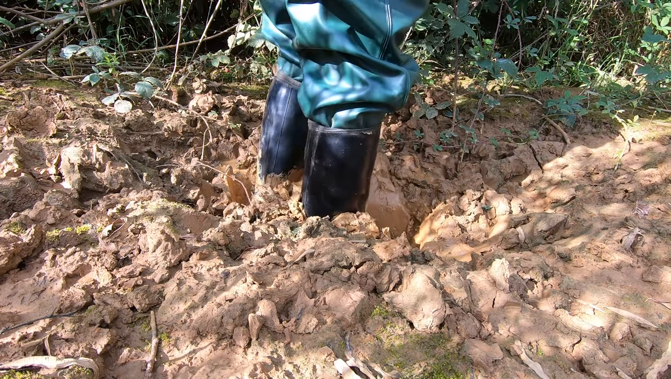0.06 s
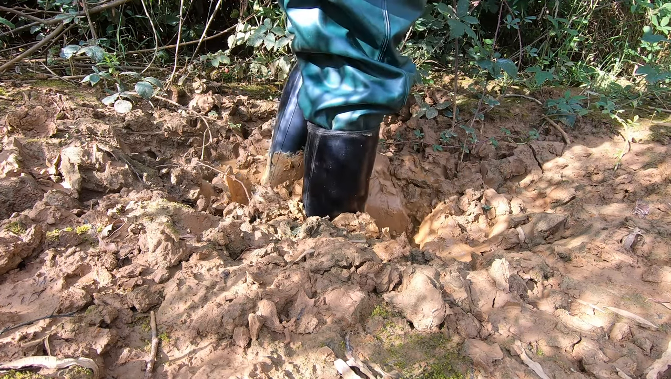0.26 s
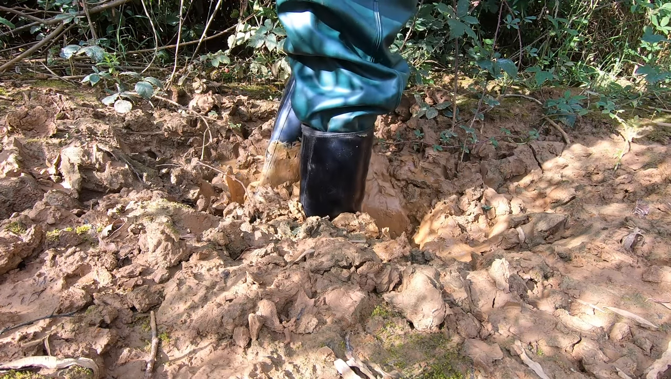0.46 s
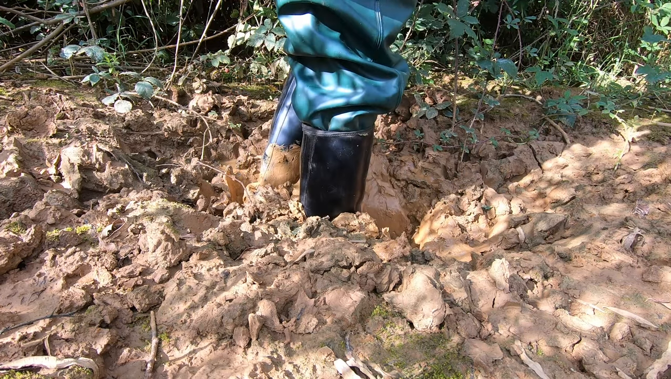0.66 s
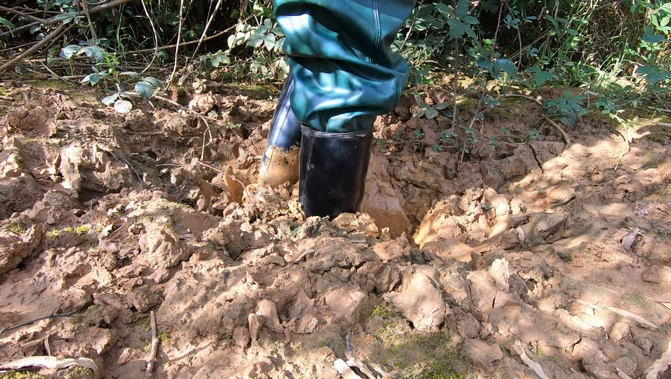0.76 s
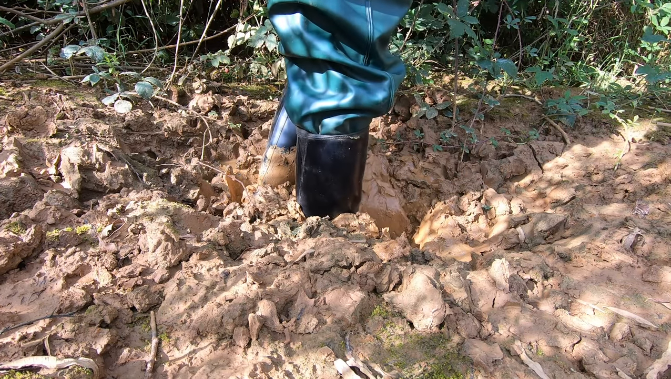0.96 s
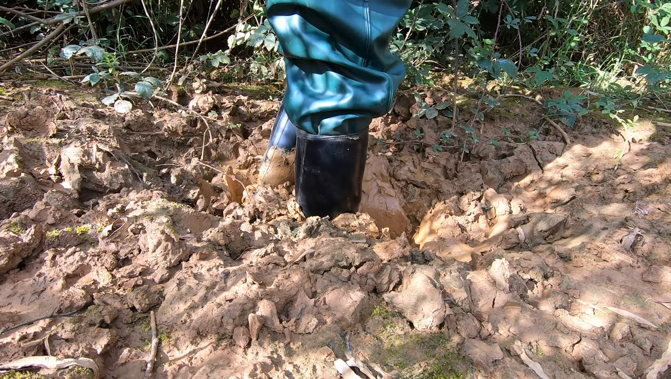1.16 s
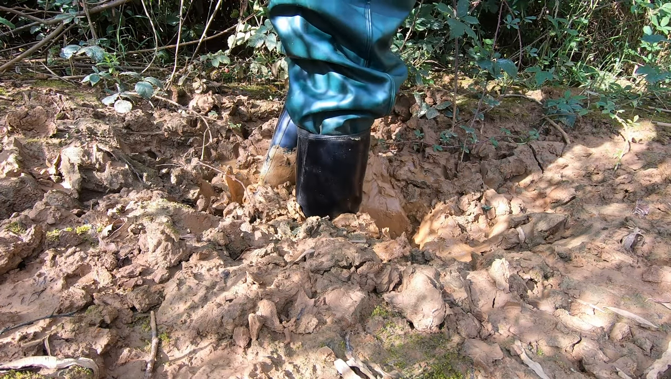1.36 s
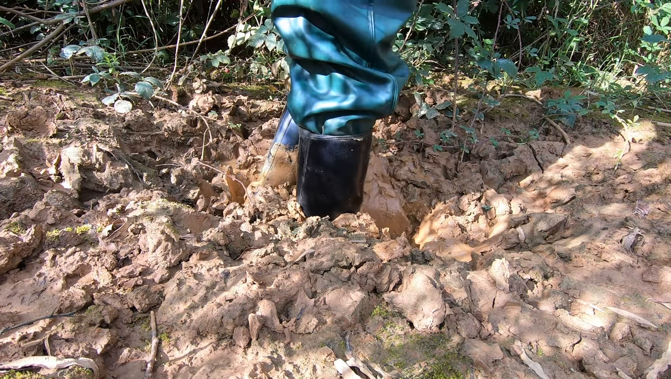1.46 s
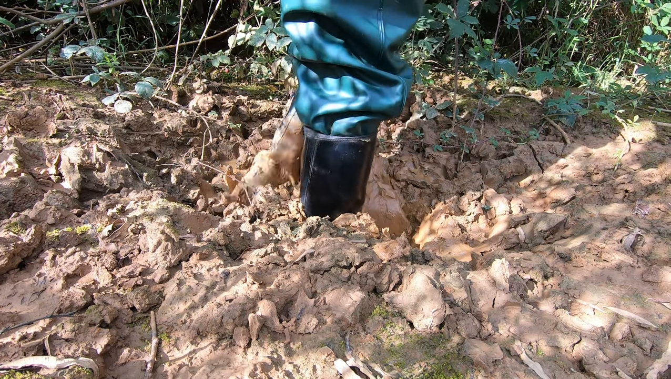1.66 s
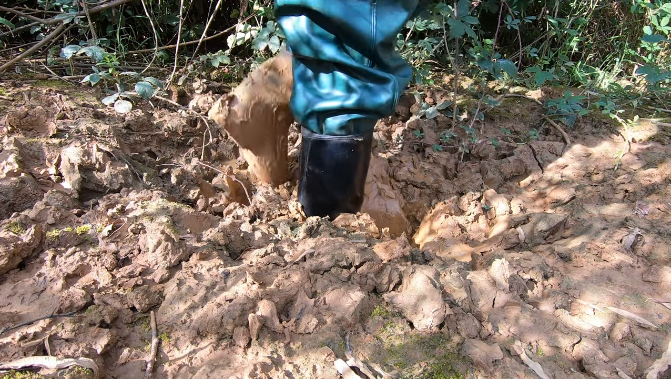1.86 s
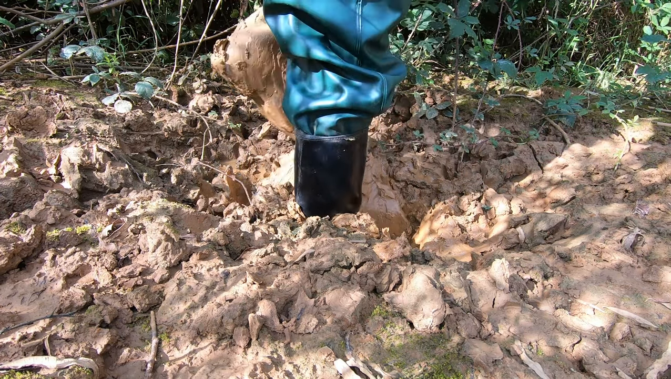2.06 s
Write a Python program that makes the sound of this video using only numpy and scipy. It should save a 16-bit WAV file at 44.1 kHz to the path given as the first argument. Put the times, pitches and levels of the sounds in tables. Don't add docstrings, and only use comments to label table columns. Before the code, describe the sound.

Two short wet mud squelches, close up, as a rubber boot sinks and is pulled out of sticky clay

```python
import sys
import numpy as np
from scipy import signal
from scipy.fft import rfft, irfft, next_fast_len
from scipy.io import wavfile
from scipy.ndimage import uniform_filter1d, map_coordinates

SR = 44100
rng = np.random.default_rng(int(sys.argv[2]) if len(sys.argv) > 2 else 0)


def amplitude_ratio(level_db):
    exponent = np.asarray(level_db, float) / 20
    return 10 ** exponent


def generate_wav(signal):
    frames = np.transpose(np.atleast_2d(signal))
    scaled = np.clip(frames, -1, 1) * 32767
    pcm = np.round(scaled).astype(np.int16)
    wavfile.write(sys.argv[1], SR, pcm)


N = 92610

# f/Hz, level/dB per Hz
HUSH_SPECTRUM = [(40, -3.5), (100, -16.5), (135, -3), (200, -1), (270, -9.5), (1300, -5.5), (7500, -17),
                 (10000, -27), (12000, -24.5)]
# f/Hz, correlation/1
HUSH_ALIKE = [(60, 1), (250, 0.5), (600, 0.14), (1500, 0.047), (3400, 0.25), (7000, 0.033)]
# t/s, level/dB
CLOTH_MOVES = [(0, -51), (.06, -57), (.1, -53.5), (.33, -55.5), (.41, -53.5), (.56, -60.5), (.68, -63),
               (.82, -59.5), (1.1, -62.5), (1.3, -62.5), (1.44, -58), (1.72, -48), (1.8, -53),
               (1.85, -48.5), (1.9, -53.5), (1.96, -49.5), (2.03, -49), (2.1, -52)]
# f/Hz, level/dB per Hz
CLOTH_SPECTRUM = [(35, -64), (60, -48), (175, -6), (703, -8), (2430, -10.5), (4250, -16), (6240, -16),
                  (10000, -27), (13000, -24)]
# t/s, peak level/dB
SLIPS = [
    (0.897, -45),
    (0.913, -40.5),
    (0.93, -45),
    (0.94, -40.5),
    (0.955, -42),
    (0.974, -43),
    (0.989, -41),
    (1.006, -40.5),
    (1.025, -39.5),
    (1.046, -50),
]
# f/Hz, width/Hz, level/dB
RUBBER_MODES = [(218, 20, 1.5), (406, 42, -2.5), (662, 99, 1), (1275, 170, -2), (2700, 510, -11)]
# t/s, peak level/dB, f/Hz
PLOPS = [(0.382, -39, 1060), (0.403, -35, 1080), (0.413, -34, 1040), (0.433, -36, 480), (0.455, -38, 1180),
         (0.471, -37, 540), (0.492, -39.5, 466), (0.535, -36, 780), (0.42, -38, 430), (0.427, -36, 1690),
         (0.522, -61, 900), (0.55, -58, 750), (0.64, -43.5, 1290), (1.47, -29.5, 824), (1.482, -26.5, 633)]
# t/s, peak level/dB, f/Hz
GLUGS = [
    (.185, -22.5, 223),
    (.195, -18, 200),
    (1.698, -23, 309),
    (1.708, -32, 285),
]
# t/s, peak level/dB, f/Hz
BIG_SNAP = [
    (0.3426, -18, 3860),
]
# t/s, peak level/dB, f/Hz
SNAPS = [(0.361, -39, 3330), (0.377, -34, 3300), (0.404, -36.5, 3260), (0.4149, -35, 2220),
         (0.4532, -41.5, 2780), (0.4718, -40, 2760), (0.477, -36, 3400), (0.4983, -39, 3450),
         (0.5217, -39, 3760), (0.5378, -34.5, 2510), (0.5744, -47, 3350), (0.6035, -42, 3480),
         (0.6434, -43, 3400), (0.384, -39.5, 2630), (0.5525, -41, 2520), (0.6217, -46, 2720),
         (0.649, -43, 2840), (0.655, -45.5, 1730), (1.2856, -50.5, 3070), (1.341, -51, 2470),
         (1.362, -43.5, 2780), (1.8433, -38.5, 3350)]
# t/s, peak level/dB, f/Hz
TICKS = [
    (0.1705, -37, 6600),
    (0.3625, -40.5, 5600),
    (0.2362, -17.5, 2920),
    (1.4823, -33.5, 5000),
    (1.5479, -19, 4660),
    (1.6764, -33, 7700),
    (1.6843, -23.5, 5430),
    (1.7406, -40.5, 8840),
    (2.02, -40, 5830),
]
# t/s, peak level/dB, f/Hz
SINK_BUBBLES = [(.203, -25, 394), (.211, -28, 380), (.215, -18.5, 900), (.221, -24, 1396), (.229, -18, 960),
                (.232, -22.5, 2727), (.234, -24.5, 266), (.2345, -28.5, 1980), (.236, -19.5, 2724),
                (.243, -15.5, 893), (.244, -21.5, 1330), (.245, -35, 4960), (.252, -20, 1418),
                (.255, -23, 5040), (.261, -18, 942), (.262, -30, 3500), (.263, -29, 313), (.264, -22, 5050),
                (.572, -47.5, 3360), (.266, -18.5, 1342)]
# t/s, peak level/dB, f/Hz
FREE_BUBBLES = [(1.469, -35, 1880), (1.483, -32.5, 1655), (1.502, -33.5, 638), (1.509, -32, 665),
                (1.522, -30, 937), (1.528, -36, 128), (1.535, -20, 847), (1.542, -21.5, 598),
                (1.543, -22.5, 950), (1.544, -26, 194), (1.546, -23, 1600), (1.572, -27, 563),
                (1.574, -19.5, 834), (1.574, -26.5, 3270), (1.58, -25, 413), (1.591, -27.5, 105),
                (1.593, -21, 1687), (1.596, -37, 616), (1.602, -28, 2700), (1.611, -24, 825),
                (1.617, -31, 3200), (1.623, -24, 2800), (1.626, -23.5, 980), (1.639, -22, 2900),
                (1.665, -31, 2900), (1.684, -34.5, 3800), (1.699, -41, 1250), (1.818, -45.5, 308),
                (1.83, -46, 3380), (1.856, -45.5, 185), (1.878, -46.5, 171), (1.918, -44, 187),
                (1.94, -42.5, 389)]
# t/s, air flow level/dB, gap opening/dB
DRAG_FLOW = [
    (1.88, -53, -3),
    (1.93, -57.5, -13),
    (1.965, -54, 5),
    (2.0, -58, 0),
    (2.06, -60.5, -4),
]
# f/Hz, width/Hz, level/dB
DRAG_POCKETS = [(1510, 97, 2.5), (2490, 87, 4), (2900, 95, 1), (6000, 840, -16)]
# t/s, air flow level/dB, gap opening/dB
SUCK_FLOW = [
    (.175, -39, -12),
    (.197, -44, -9),
    (.217, -29, -11.5),
    (.231, -31.5, -5),
    (.247, -20.5, -6),
    (.257, -26, -2.5),
    (.272, -27.5, -2),
    (.284, -49.5, -0.5),
    (.32, -59, 11),
]
# f/Hz, width/Hz, level/dB
SUCK_POCKETS = [(380, 88, -3), (866, 203, -4), (1390, 66, -9.5), (2754, 145, -5), (3500, 190, -7.5),
                (4960, 200, -10), (6800, 360, -24.5)]
# f/Hz, level/dB per Hz
SUCK_AIR = [(29, -48), (50, -5.5), (933, -4), (1420, -47), (1660, -25), (2700, -12.5), (10000, -26.5),
            (13000, -65), (22000, -120)]
# t/s, air flow level/dB, gap opening/dB
PULL_FLOW = [
    (1.45, -75, -15),
    (1.468, -44, -2),
    (1.51, -37, -9),
    (1.544, -31.5, -12.5),
    (1.556, -34.5, -6),
    (1.6, -31.5, -4.5),
    (1.634, -29.5, -3.5),
    (1.672, -42, -3.5),
    (1.7, -65, 2.5),
]
# f/Hz, width/Hz, level/dB
TIGHT_POCKETS = [(639, 66, -6), (830, 130, -4), (1627, 100, -6.5), (1950, 82, -4), (2560, 35, -9),
                 (2960, 120, -15), (4800, 130, -10.5), (5780, 100, -14)]
# f/Hz, width/Hz, level/dB
LOOSE_POCKETS = [(824, 190, -5.5), (1620, 190, -9), (1983, 29, -10), (2800, 360, -5.5), (3200, 120, -7),
                 (3850, 94, -7), (4546, 100, -10.5), (5640, 230, -12.5), (6960, 81, -17.5)]
# f/Hz, level/dB per Hz
PULL_AIR = [(29, -40), (50, -7), (715, -7), (835, 10.5), (1330, -18), (1660, -6), (10000, -35),
            (13000, -56), (22000, -120)]
AIR_BANDS_HZ = [75, 140, 280, 600, 1300, 2800, 5500, 10000]
# f/Hz, left over right level/dB, left lead/rad
PORT_SHADING = [(150, -2, .15), (550, -2, .5), (750, .5, .75), (980, 4, 1), (1300, 4.5, 0), (2300, 3, -.2),
                (3000, 1, 0), (5200, .5, .3), (9000, 0, 1), (13000, -1.5, 1.5)]
# f/Hz, level/dB
MIC_RESPONSE = [(45, -6), (85, 1.5), (9700, -1.76), (11200, -13.5), (15500, -16)]


def unit(x):
    return x / np.sqrt(np.mean(x ** 2) + 1e-20)


def along(points, hz):
    f, v = np.transpose(points)
    return np.interp(np.log(hz + 1), np.log(f + 1), v)


def curves(rows):
    s, *cols = np.transpose(rows)
    return [np.interp(np.arange(N) / SR, s, c) for c in cols]


def wobble(rate_hz):
    knots = rng.standard_normal(int(N * rate_hz / SR) + 4)
    return map_coordinates(knots, [np.arange(N) * rate_hz / SR])


def filtered(x, response):
    m = next_fast_len(N + 8192)
    spectrum = rfft(x, m) * response(np.fft.rfftfreq(m, 1 / SR))
    return irfft(spectrum, m)[..., :N]


def ringing(modes, f):
    total = 0
    for k, (hz, width_hz, db) in enumerate(modes):
        resonance = 1j * f * width_hz / (hz * hz - f * f + 1j * f * width_hz)
        total = total + (-1) ** k * amplitude_ratio(db) * resonance
    return total


def rush(spectrum, alike, patchy_db):
    z = signal.stft(rng.standard_normal((2, N + 512)), nperseg=256)[2]
    field = uniform_filter1d(rng.standard_normal(z.shape[1:]), size=4, axis=0)
    field = uniform_filter1d(field, size=12, axis=1)
    pair = signal.istft(z * amplitude_ratio(patchy_db * unit(field)), nperseg=256)[1][:, :N]

    def mid_side(hz):
        angle = np.arccos(np.clip(along(alike, hz), -1, 1)) / 2
        return amplitude_ratio(along(spectrum, hz)) * [np.cos(angle), np.sin(angle)]

    mid, side = filtered(pair, mid_side)
    return unit(np.array([mid + side, mid - side]))


def hush():
    level_db = -59.5 + np.array([[-2], [2]])
    return amplitude_ratio(level_db) * rush(HUSH_SPECTRUM, HUSH_ALIKE, patchy_db=0.7)


def bank(x):
    t60_s, level_db = 0.085, -5.5
    t = np.arange(SR // 5) / SR
    tail = rng.standard_normal((2, len(t))) * amplitude_ratio(-60 * t / t60_s)
    tail = tail / np.linalg.norm(tail[0])
    late = np.pad(x, (130, 0))[None]
    wet = signal.fftconvolve(late, tail, axes=1)[:, :N]
    tone = [(300, -18.5), (1200, 0.0), (3000, -12.5), (7000, 5.0), (12000, 4.0)]  # f/Hz, level/dB
    return amplitude_ratio(level_db) * filtered(wet, lambda f: amplitude_ratio(along(tone, f)))


def ports(x):
    hz, db, lead_rad = np.transpose(PORT_SHADING)

    def response(f):
        level_db = along(np.transpose([hz, db]), f)
        phase_rad = along(np.transpose([hz, lead_rad]), f)
        return np.array([amplitude_ratio(k * level_db) * np.exp(1j * k * phase_rad) for k in (.5, -.5)])

    return filtered(x, response)


def cloth():
    move_db, = curves(CLOTH_MOVES)
    grain = amplitude_ratio(1.6 * wobble(150))
    alike = [(200, 0.95), (4000, 0.7), (8000, 0.39)]  # f/Hz, correlation/1
    return amplitude_ratio(move_db + 1.0) * unit(grain * rush(CLOTH_SPECTRUM, alike, patchy_db=1.4))


def judder():
    slip_s = 0.014
    kicks, t = np.zeros(N + SR), np.arange(1024) / SR
    for s, db in SLIPS:
        burst = amplitude_ratio(db + 12 - 20 * t / slip_s) * rng.standard_normal(len(t))
        kicks[round(s * SR):][:len(t)] += burst
    return filtered(kicks[:N], lambda f: ringing(RUBBER_MODES, f))


def pops(rows, cycles, spread, puff_db, wide=0.17):
    puff_s = 0.0063
    out, t = np.zeros(N + SR), np.arange(2048) / SR
    for s, db, hz in rows:
        tones = 0
        for k in (-1, 0, 1.3):
            phase = 2 * np.pi * hz * (1 + spread * k) * t + rng.uniform(0, 3.2)
            tones = tones + np.sin(phase) * amplitude_ratio(-4 * abs(k))
        edges_hz = [hz * (1 - wide), hz * (1 + 1.5 * wide)]
        band = signal.butter(2, edges_hz, "band", fs=SR, output="sos")
        puff = unit(signal.sosfilt(band, rng.standard_normal(len(t))))
        puff = puff * amplitude_ratio(puff_db - 20 * t / puff_s)
        attack = 1 - np.exp(-(t * hz / 1.26) ** 2)
        pop = (tones * amplitude_ratio(-60 * t * hz / cycles) + puff) * attack
        out[round(s * SR):][:len(t)] += amplitude_ratio(db - 6.0) * pop
    return out[:N]


def plops():
    soft = pops(PLOPS, cycles=16.5, spread=0.36, puff_db=2.0, wide=0.35)
    return soft + pops(GLUGS, cycles=11.1, spread=0.14, puff_db=-25)


def snaps():
    big = pops(BIG_SNAP, cycles=60, spread=0.173, puff_db=-9)
    small = pops(SNAPS, cycles=56, spread=0.14, puff_db=-5.5, wide=0.26)
    return big + small + pops(TICKS, cycles=59, spread=0.139, puff_db=1.5, wide=0.14)


def bubbles(rows):
    t60_s, rise_s, climb = 0.03, 0.0027, 0.028
    out, t = np.zeros(N + SR), np.arange(6144) / SR
    for s, db, hz in rows:
        longer = (1000 / hz) ** 0.39
        age = t / (t60_s * longer)
        tone = np.sin(2 * np.pi * hz * t * (1 + climb * np.minimum(age, 1)))
        swell = 1 - np.exp(-(t / (rise_s * longer)) ** 2)
        out[round(s * SR):][:len(t)] += amplitude_ratio(db + 5.0 - 60 * age) * swell * tone
    return out[:N]


def squelch(control, pockets, air, share, bed_db, lumpy_db, boost_db, bass_tilt):
    pivot_hz, treble_tilt = 1120, 0.52
    start_s, end_s = control[0][0], control[-1][0]
    flow_db, open_db = curves(control)
    open_db = open_db - np.mean(np.transpose(control)[2])
    t = np.arange(N) / SR
    on = share * np.clip(np.minimum(t - start_s, end_s - t) / 0.027, 0, 1)
    gulps = .55 * wobble(110) + .85 * wobble(330)
    part = slice(round(start_s * SR), round(end_s * SR) + 4096)

    def drive(hz):
        octaves = np.log2(hz / pivot_hz)
        tilt = np.clip(octaves * (treble_tilt if octaves > 0 else bass_tilt), -1.5, 2.6)
        sputter = .55 * gulps + .55 * wobble(140) + .3 * wobble(45)
        db = flow_db + boost_db + tilt * open_db + lumpy_db * sputter
        return (on * amplitude_ratio(db) * rng.standard_normal(N))[part]

    out = np.zeros(N)
    for hz, width_hz, db in pockets:
        b, a = signal.iirpeak(hz, hz / max(width_hz, 15), SR)
        out[part] += amplitude_ratio(db) * signal.lfilter(b, a, drive(hz))
    for hz in AIR_BANDS_HZ:
        band = signal.butter(2, [hz / 1.47, hz * 1.47], "band", fs=SR, output="sos")
        out[part] += amplitude_ratio(along(air, hz) + bed_db) * signal.sosfilt(band, drive(hz))
    return out


def drag():
    return squelch(DRAG_FLOW, DRAG_POCKETS, PULL_AIR, 0.98,
                   bed_db=-27, lumpy_db=0.0, boost_db=18, bass_tilt=0.1)


def suck():
    return squelch(SUCK_FLOW, SUCK_POCKETS, SUCK_AIR, 0.86,
                   bed_db=-6.0, lumpy_db=4.0, boost_db=17.5, bass_tilt=0.86)


def pull():
    gives_s, giving_s = 1.55, 0.031
    loose = np.clip((np.arange(N) / SR - gives_s) / giving_s + .5, 0, 1)
    before = squelch(PULL_FLOW, TIGHT_POCKETS, PULL_AIR, np.sqrt(1 - loose),
                     bed_db=-8.5, lumpy_db=4.5, boost_db=20.0, bass_tilt=0.035)
    after = squelch(PULL_FLOW, LOOSE_POCKETS, PULL_AIR, np.sqrt(loose),
                    bed_db=2.0, lumpy_db=4.0, boost_db=16, bass_tilt=0.063)
    return before + after


def scene():
    near = judder() + plops() + snaps()
    near = near + bubbles(SINK_BUBBLES) + bubbles(FREE_BUBBLES)
    near = near + drag() + suck() + pull()
    return hush() + bank(near) + ports(near + cloth())


def low_pass(x):
    return signal.sosfilt(signal.butter(12, 15670, fs=SR, output="sos"), x)


def record(dry):
    mix = filtered(dry, lambda f: amplitude_ratio(along(MIC_RESPONSE, f)))
    return low_pass(mix)


dry = scene()
out = record(dry)
generate_wav(out)
```